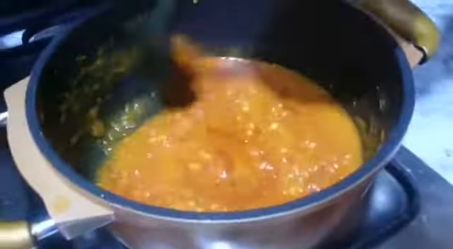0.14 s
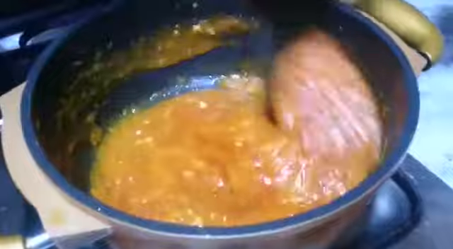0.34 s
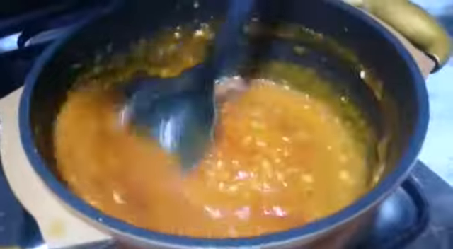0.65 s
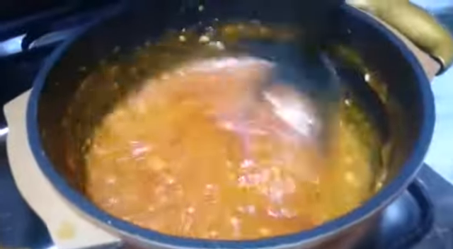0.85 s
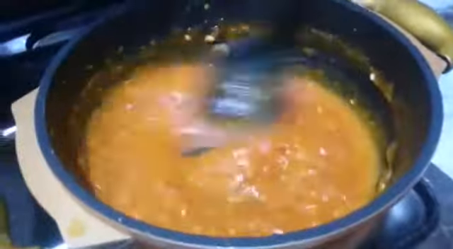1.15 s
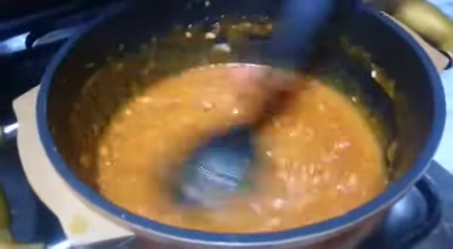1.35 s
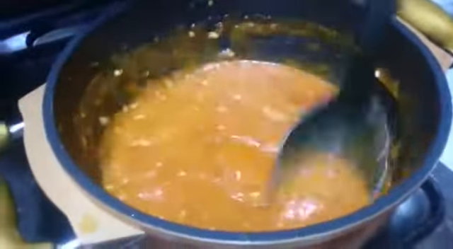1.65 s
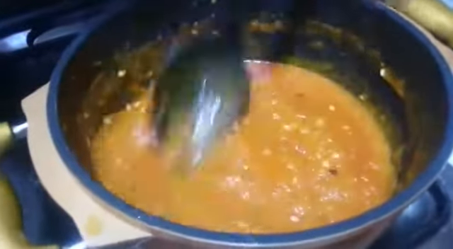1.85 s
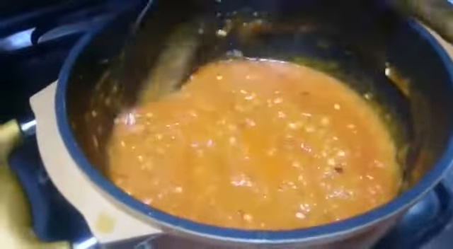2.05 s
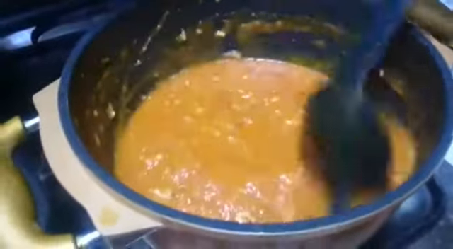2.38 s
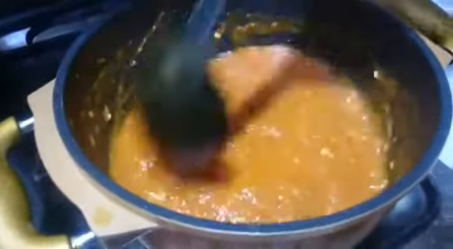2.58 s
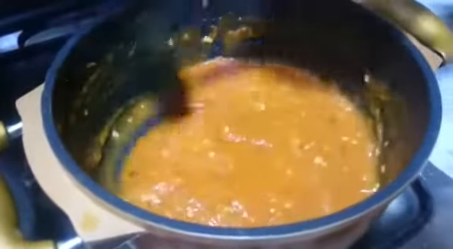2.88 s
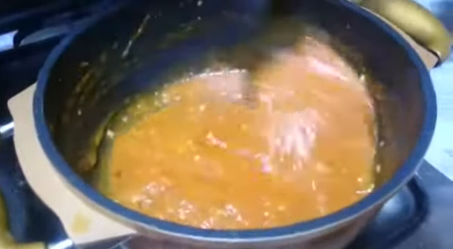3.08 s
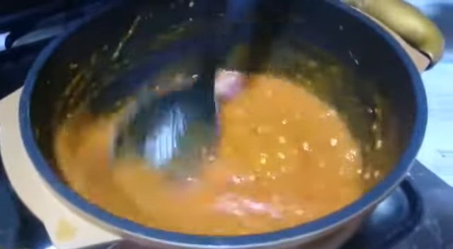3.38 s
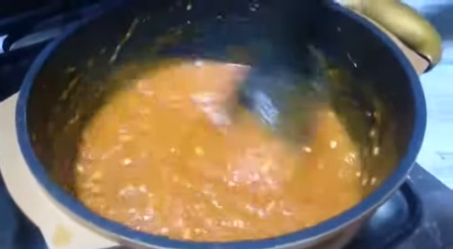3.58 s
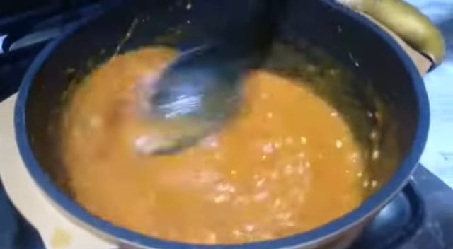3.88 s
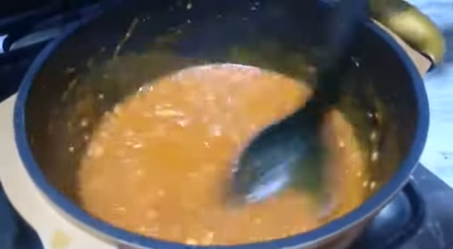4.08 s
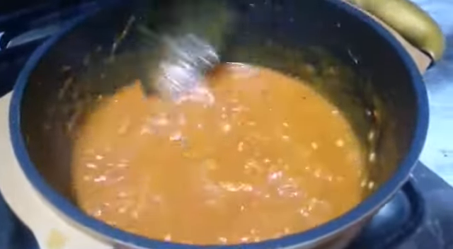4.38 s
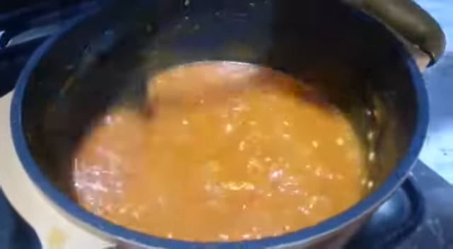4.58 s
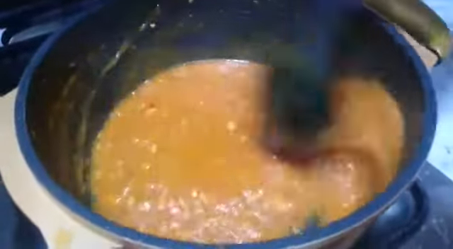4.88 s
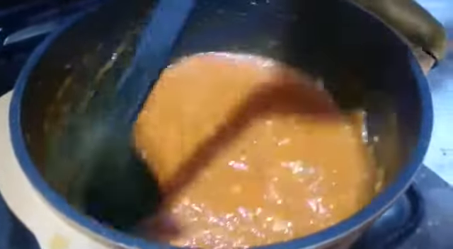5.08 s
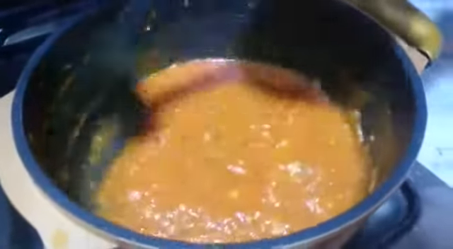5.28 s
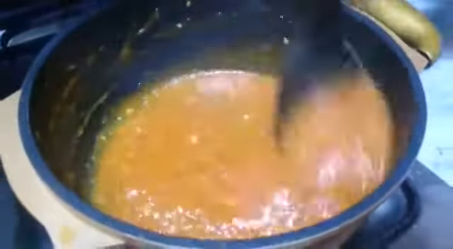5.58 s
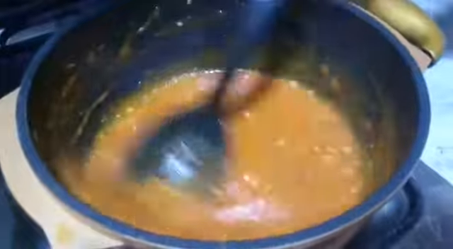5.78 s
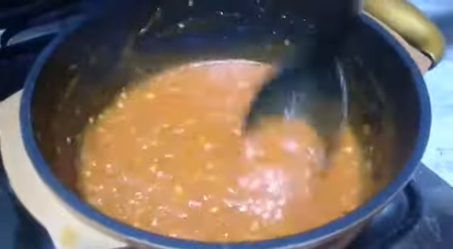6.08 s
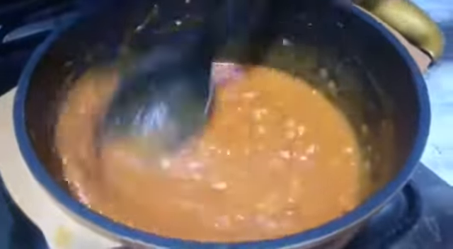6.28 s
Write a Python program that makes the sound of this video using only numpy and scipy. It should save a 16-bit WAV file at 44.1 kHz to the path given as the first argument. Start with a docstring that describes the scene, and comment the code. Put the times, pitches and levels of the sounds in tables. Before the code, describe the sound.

A plastic spoon stirs thick sauce in a coated metal pot on a stove. Irregular hollow knocks ring briefly and are damped by the sauce, each with a soft low thump beneath. Between them come quiet rubbing, raspy scrapes on the bare wall, tiny squeaks and bright wet smacks. Heard very close in a small kitchen with faint steady hiss; fuller and louder on the right, thin on the left.

```python
"""Stirring thick sauce in a metal pot

A plastic spoon stirs thick sauce in a coated metal pot on a stove, heard close by in a small kitchen.
Knocks and rubbing ring the pot's damped modes; friction and slosh are coloured noise, squeaks are narrow tones.
Torn sauce films smack in short bright bursts, and the stove thumps under each blow.
The right port faces the pot; the left one hears the bass inverted and a faint, bright view of the rest."""
import sys
import numpy as np
from scipy import signal
from scipy.fft import rfft, irfft
from scipy.io import wavfile
from scipy.ndimage import uniform_filter1d

SR = 44100
rng = np.random.default_rng(int(sys.argv[2]) if len(sys.argv) > 2 else 0)


def pcm_store(signal):
    """Save signal as 16-bit PCM."""
    levels = np.round(np.clip(np.atleast_2d(signal), -1, 1) * 32767)
    wavfile.write(sys.argv[1], SR, levels.astype(np.int16).T)


N = 284004  # samples

# Spoon striking the pot. Each row: start in seconds, relative blow level in dB, then wall ring, bass,
# body and lowest mode, all four in dB against the blow.
KNOCKS = [(0.0606, -42, -9, -11, -6, -15), (0.1489, -29.5, 11, -9.5, -4, -4),
          (0.4186, -17, -11.5, -13.5, -1, -7), (0.8465, -25, 1, -14, -6, 1),
          (0.9513, -20, -10, -14, -3.5, 1.5), (1.369, -35.5, -41, -18, -10, -15),
          (1.6831, -18, -18, -19, -6, -13), (2.0814, -32.5, -11, -8, -20, -5),
          (2.1388, -33.5, -11, -11, 1.5, -2), (2.163, -39.5, 3.5, -11, -6, 2),
          (2.1907, -15, 1, -14, -12, -2), (2.2649, -18, -19, -15.5, -4, -1.5),
          (2.7711, -28, -9, -45, -19, -30), (2.8887, -19, 4.5, -21, -15, -1.5),
          (3.1903, -16.5, -18, -17, -2, -14), (3.4026, -32.5, -25, -25, -7.5, -12),
          (4.142, -37, -3.5, -35, -18, -28), (4.4757, -30, -9, -6.5, -9, -4),
          (4.5149, -32, -11, -21, 1, -5), (4.6143, -16, 3.5, -18, -12, -5.5),
          (4.6963, -17.5, -26, -16.5, -8.5, -5), (5.1642, -55, 9, -15, -12, -22),
          (5.2986, -18, 5, -20, -13, -7), (5.5837, -15, -18, -18.5, -5.5, -15)]
# Sauce smacking off the spoon. Each row: start in seconds, relative level in dB, top treble in dB against it.
SMACKS = [(0.0024, -7.5, -21), (0.687, -11.5, -34.5), (0.725, -30.5, -16), (1.386, -22.5, -20.5),
          (1.5002, -17.5, -18.5), (1.511, -23.5, -17), (1.762, -33, -9), (1.898, -34, -25),
          (2.08, -25, -19), (2.5701, -53.5, -1.5), (2.7676, -11.5, -21.5), (2.851, -23, -28),
          (3.4018, -21, -24), (3.478, -21, -27), (4.1405, -16.5, -18.5), (4.474, -25, -22),
          (4.551, -30, -17), (4.889, -33, -33), (5.1636, -17, -28.5), (5.263, -22, -30),
          (5.634, -21.5, -24), (5.8057, -35.5, -24), (5.833, -29, -19), (6.25, -47, -12),
          (6.286, -48.5, -6)]
# Modes of the pot, damped by sauce. Each row: frequency in Hz, level in dB, time to decay by 60 dB in seconds.
POT_MODES = [(201.4, -19.5, 0.53), (698, -7, 0.24), (767.7, 2.5, 0.074), (932, -5.5, 0.021),
             (1116, -6, 0.058), (1265, -4.5, 0.085), (1354, -7.5, 0.12), (1957, -19, 0.12),
             (2068, -10, .12), (2241, 2, .115), (2330, -9, .07), (2410, -11, .09), (2475, -8, .12),
             (2630, -39, 0.016), (2870, -7.5, 0.033), (3190, -3.5, 0.026), (3105, -14.5, 0.013),
             (3357, -5, 0.03), (3623, -6.5, 0.0086), (3776, -17, 0.056), (4000, -55, 0.17),
             (5220, 1, 0.013), (5570, -12.5, 0.061), (6110, 2, 0.044), (6520, 2, 0.011), (6600, -15, 0.042)]
# Spectrum of a blow's crack. Each row: frequency in Hz, gain in dB.
CRACK_SPECTRUM = [(100, -21), (400, -7), (900, 6), (2500, 8), (3800, -3), (4600, -1.5), (6200, 0.5),
                  (8500, -6), (10500, -19), (16000, -92)]
# Spectrum of rubbing friction. Each row: frequency in Hz, gain in dB.
RUB_SPECTRUM = [(500, -19.5), (1000, -2), (2000, 5), (3200, 2.5), (4000, -1), (4600, -19), (6000, -37)]
# Spectrum shape of the steady kitchen noise. Each row: frequency in Hz, relative density in dB.
HUM_SPECTRUM = [(18, -25), (30, 11), (48, -19), (138, -21), (600, -18), (780, 16), (2480, -35), (3060, 5),
                (4420, 0), (6210, 3.5), (16000, -83)]
# Response of the port facing the pot. Each row: frequency in Hz, gain in dB.
RIGHT_PORT = [(30, 13), (150, 9), (350, 10), (700, 9.5), (1500, 6), (7000, 8), (11000, 1.5), (16000, 3.5)]
# Response of the other port. Each row: frequency in Hz, gain in dB.
LEFT_PORT = [(30, -12.5), (200, 1), (600, 3), (1200, -5.5), (2500, -13), (5000, -16), (7500, -3),
             (11000, 0), (16000, 0)]
# The spoon drags and one patch of the pot sings. Each row: start in seconds, length in seconds,
# centre in Hz, level in dB.
SQUEAKS = [(.255, 0.042, 2240, -51), (0.319, 0.05, 2560, -42.5), (1.221, 0.042, 2930, -52),
           (1.39, 0.06, 3260, -52.5), (1.572, 0.057, 3340, -49.5), (1.613, 0.071, 2780, -51),
           (1.857, 0.076, 3150, -54.5), (1.848, 0.093, 2020, -55), (2.615, 0.024, 3500, -54),
           (2.994, 0.098, 6170, -51.5), (3.049, 0.071, 2560, -45), (3.101, 0.051, 1820, -51),
           (3.554, 0.055, 3020, -52), (4.203, 0.18, 3150, -57.5), (4.94, .09, 3650, -52.5),
           (5.441, 0.025, 5570, -46), (5.46, 0.06, 2570, -48.5), (5.488, .055, 2280, -47),
           (5.992, 0.069, 2970, -51.5), (6.231, 0.12, 3040, -52.5)]
# The spoon dragging through sauce, dipping where it lifts. Each row: time in seconds, rub level in dB.
DRAG = [(0, -49.5), (.55, -54.5), (1.34, -54), (1.76, -55), (1.9, -53), (1.95, -68), (2.1, -56), (2.3, -59),
        (2.48, -53.5), (2.53, -63), (2.8, -60.5), (3.4, -54), (3.52, -56), (3.9, -58.5), (4.3, -53.5),
        (4.38, -63.5), (4.58, -52), (4.8, -53.5), (5.1, -59), (5.95, -54), (6.2, -58.5), (6.44, -55)]
# The spoon edge scraping the bare wall. Each row: start in seconds, time held in seconds,
# edge rasp in dB, change while held in dB.
SCRAPES = [(.08, 0.37, -48.5, -0.5), (.72, 0.018, -58, -4), (2.301, 0.086, -47.5, 2),
           (2.85, .38, -47.5, -4.5), (3.3, 0.13, -62.5, 0), (4.68, 0.25, -50.5, -7),
           (5.25, 0.29, -45, -6.5), (6.24, 0.071, -64, 0)]

HUM_DB = -65
EDGE_DB, EDGE_PER_WALL_DB = -10.5, -0.23  # treble of a blow: duller the more the wall rings
THUMP_DB, THUMP_PER_BASS_DB = -15.5, 0.52  # stove thump against the blow, rising with its bass
SMACK_HZ, SMACK_T60_S, SMACK_RISE_S = 6260, 0.018, 0.0012
SCRAPE_ATTACK_S, SCRAPE_RELEASE_DB_PER_S = 0.088, 224
SCRAPE_RUB_DB, SCRAPE_FIZZ_DB = -3, -14.5  # against the rasp
DRAG_EDGE_DB, DRAG_FIZZ_DB = -10, -30  # against the drag
SLOSH_DB, SLOSH_BLOW_DB, SLOSH_T60_S = -62.5, -31.5, 1.07  # at rest; against a blow; settling
SLOSH_PER_DRAG_DB = 0.18
SHUDDER_DB, SHUDDER_T60_S = -8.5, 0.13  # the spoon skids on after a blow
WALL_WIDTH_HZ, SAUCE_WIDTH_HZ = 25, 410  # pure on the bare wall, blurred under sauce
FAINT_COUNT, FAINT_S, FAINT_WIDTH_HZ = 30, 0.06, 200  # chance squeaks, with their mean length
FAINT_LOW_HZ, FAINT_HIGH_HZ, FAINT_DB = 1800, 3600, -3  # level against the drag
EARLY_T60_S, LATE_T60_S, LATE_DB = 0.05, 0.3, 20  # late part against the early one
ROOM_DB = -11
SHARED_HZ, SHARED_DB = 537, -3  # inverted bass in the left channel
TOP_HZ = 16200


def amp(db):
    """Decibel law: the amplitude ratio of a level in dB."""
    return 10 ** (np.asarray(db) / 20)


def unit(x):
    """Normalisation: scales to rms 1."""
    return x / np.sqrt(np.mean(x ** 2))


def power_sum(*levels_db):
    """Incoherent addition: the powers of unrelated sounds add."""
    return 10 * np.log10(sum(amp(db) ** 2 for db in levels_db))


def decay(t, t60):
    """Exponential damping: amplitude falls by 60 dB in t60 seconds."""
    return np.exp(-np.log(1000) * t / t60)


def colour(x, points):
    """Minimum-phase filtering: the folded cepstrum makes causal a gain through (Hz, dB) points on a log axis."""
    size = 4096
    hz, db = np.transpose(points)
    bins_hz = np.arange(size // 2 + 1) * SR / size
    gain_db = np.interp(np.log(bins_hz + 1), np.log(hz), db)
    cepstrum = irfft(np.log(amp(gain_db)), size)
    cepstrum[1:size // 2] *= 2
    cepstrum[size // 2 + 1:] = 0
    impulse_response = irfft(np.exp(rfft(cepstrum)), size)[:size // 2]
    return signal.oaconvolve(x, impulse_response)[:len(x)]


def ring(x, hz, t60):
    """Damped resonance: one mode, which an impulse of 1 rings with amplitude 1."""
    radius = decay(1 / SR, t60)
    angle = 2 * np.pi * hz / SR
    return signal.lfilter([0, radius * np.sin(angle)], [1, -2 * radius * np.cos(angle), radius ** 2], x)


def walk(rate):
    """Random modulation: levels of spread near 1, redrawn rate times a second and joined by glides."""
    hold = int(SR / rate)
    steps = np.repeat(rng.standard_normal(N // hold + 1), hold)
    return uniform_filter1d(steps, hold)[:N]


def add(out, s, piece):
    """Superposition: mixes a piece in at time s in seconds."""
    i = int(s * SR)
    out[i:i + len(piece)] += piece[:len(out) - i]


def burst(rise_s, t60, size=8192):
    """Transient noise: swells with time constant rise_s and dies over t60."""
    t = np.arange(size) / SR
    return rng.standard_normal(size) * (1 - np.exp(-t / rise_s)) * decay(t, t60)


def grit(rough_db):
    """Friction noise: dense slips of uneven size."""
    return unit(rng.standard_normal(N) * amp(rough_db * walk(400)))


def patchy(x, patchy_db):
    """Time-frequency modulation: small patches of pitch and time swell and sink on their own."""
    spectrum = signal.stft(x, nperseg=512)[2]
    patch = uniform_filter1d(rng.standard_normal(spectrum.shape), size=3, axis=0)
    patch = uniform_filter1d(patch, size=6, axis=1)
    return unit(signal.istft(spectrum * amp(patchy_db * unit(patch)), nperseg=512)[1][:N])


def kitchen_hum():
    """Stationary noise: the steady coloured background of the kitchen."""
    return amp(HUM_DB) * unit(colour(rng.standard_normal(N), HUM_SPECTRUM))


def after_blows(t, t60):
    """Exponential settling: the level in dB of what each blow sets moving."""
    return power_sum(*(np.where(t > s, blow - 60 * (t - s) / t60, -200) for s, blow, *_ in KNOCKS))


def scraping(t):
    """Envelope of dry friction: each scrape builds, drifts while held and falls away, in dB."""
    levels_db = []
    for s, held, db, change_db in SCRAPES:
        attack_db = 20 * np.log10(np.clip((t - s) / SCRAPE_ATTACK_S, 1e-6, 1))
        drift_db = change_db * np.clip((t - s) / held, 0, 1)
        release_db = SCRAPE_RELEASE_DB_PER_S * np.maximum(t - s - held, 0)
        levels_db.append(db + attack_db + drift_db - release_db)
    return power_sum(*levels_db)


def motion():
    """Common excitation: drag, scrapes and blows set rub, edge rasp, fizz and slosh, in dB every 1 ms."""
    t = np.arange(0, N / SR, 1 / 1000)
    drag_db = np.interp(t, *np.transpose(DRAG))
    scrape_db = scraping(t)
    shudder_db = after_blows(t, SHUDDER_T60_S) + SHUDDER_DB
    rub_db = power_sum(drag_db, scrape_db + SCRAPE_RUB_DB, shudder_db)
    edge_db = power_sum(drag_db + DRAG_EDGE_DB, scrape_db)
    fizz_db = power_sum(drag_db + DRAG_FIZZ_DB, scrape_db + SCRAPE_FIZZ_DB)
    stirred_db = SLOSH_DB + SLOSH_PER_DRAG_DB * (drag_db - drag_db.mean())
    slosh_db = power_sum(stirred_db, after_blows(t, SLOSH_T60_S) + SLOSH_BLOW_DB)
    return rub_db, edge_db, fizz_db, slosh_db


def stirring(rub_db, edge_db, fizz_db, slosh_db):
    """Sliding friction and liquid motion: broad rub, edge rasp near 6 kHz, fine fizz and low slosh."""
    edge_shape = [(4000, -14.5), (5200, -4.5), (6200, -2), (7500, -8), (9000, -10), (11000, -27)]
    fizz_shape = [(7000, -36), (10000, 0), (15000, -6.5)]
    slosh_shape = [(25, -8.5), (70, 6.5), (400, 0.5), (800, -3.5), (1500, -2.0), (2500, -31.5)]
    rub = patchy(colour(grit(2.7), RUB_SPECTRUM), patchy_db=3.5)
    edge = patchy(colour(grit(2.5), edge_shape), patchy_db=2.0)
    fizz = patchy(colour(grit(2.8), fizz_shape), patchy_db=1.0)
    slosh = unit(colour(grit(0.87), slosh_shape))
    flutter_db = 1.6 * walk(35)  # shared by rasp and fizz
    return (rub * amp(rub_db + 2.02 * walk(25)) + edge * amp(edge_db + flutter_db)
            + fizz * amp(fizz_db + flutter_db) + slosh * amp(slosh_db + 2.1 * walk(12)))


def edge_of_blow(wall):
    """Spectral balance of impact: treble in dB against the blow, from its wall ring."""
    return EDGE_DB + EDGE_PER_WALL_DB * wall


def pot(rub_db):
    """Modal synthesis: blows and rubbing drive the same modes; each contact point favours other ones."""
    out = np.zeros(N)
    shape = (len(KNOCKS), len(POT_MODES))
    spot_db = 2.8 * rng.standard_normal(shape)
    # bending waves reach each mode within the first milliseconds, in either direction
    late_s = 0.003 * rng.random(shape)
    sign = rng.choice([-1, 1], shape)
    slips = grit(1.3)
    tone_hz = [300, 600, 850, 900, 1400, 1800, 2050, 2500, 2580, 4200, 5300]
    for m, (hz, db, t60) in enumerate(POT_MODES):
        mode_rub_db = np.interp(hz, *np.transpose(RUB_SPECTRUM)) - 52.5
        push = slips * amp(rub_db + mode_rub_db + 0.83 * walk(28))
        for k, (s, blow, wall, bass, body, rock) in enumerate(KNOCKS):
            # blows also rock the whole pot at its lowest mode
            tones_db = [rock, bass, bass, body, body, 0, wall, wall, 0, 0, edge_of_blow(wall)]
            blow_db = blow + np.interp(hz, tone_hz, tones_db) + spot_db[k, m] - 3.0
            push[int((s + late_s[k, m]) * SR)] += sign[k, m] * amp(blow_db)
        out += amp(db) * ring(push, hz, t60)
    # soft plastic cannot drive the highest pitches
    return signal.sosfilt(signal.butter(4, 8500, fs=SR, output="sos"), out)


def smacks():
    """Film rupture: short bright bursts as sauce films tear."""
    out = np.zeros(N)
    for s, db, top_db in SMACKS:
        tick = burst(SMACK_RISE_S, SMACK_T60_S)
        film_fizz = amp(-17.5) * burst(0.0045, 0.1)
        shape = [(900, -30), (3500, -13), (SMACK_HZ, 0), (9800, top_db + 9.5), (16000, top_db)]
        add(out, s, amp(db + 2.5) * colour(tick + film_fizz, shape))
    return out


def cracks():
    """Broadband impact: the dense rest of each blow, as coloured noise."""
    out = np.zeros(N)
    for s, blow, wall, bass, body, _ in KNOCKS:
        balance = [(700, bass), (1300, body), (2000, 0), (4200, 0.0043), (5300, edge_of_blow(wall))]
        crack = colour(colour(burst(0.00023, 0.095), CRACK_SPECTRUM), balance)
        add(out, s, crack * amp(blow - 3.0))
    return out


def thumps():
    """Structure-borne sound: under each blow a rumble swells late in the stove."""
    out = np.zeros(N)
    shape = [(30, -21), (90, 2), (350, 6.0), (1200, -1.5), (2500, -63)]
    for s, blow, _, bass, *_ in KNOCKS:
        thump_db = THUMP_DB + THUMP_PER_BASS_DB * bass
        rumble = colour(burst(0.014, 0.36, size=16384), shape)
        add(out, s, amp(blow + thump_db + 11.5) * rumble)
    return out


def on_bare_wall(s):
    """Contact condition: whether a scrape is being held at time s."""
    return any(start < s < start + held for start, held, *_ in SCRAPES)


def squeaks(faint):
    """Stick-slip: friction locks on to one resonance, whose wandering phase sets the width."""
    out = np.zeros(N)
    rows = []
    for s, length, hz, db in SQUEAKS:
        rows.append((s, length, hz, WALL_WIDTH_HZ if on_bare_wall(s) else SAUCE_WIDTH_HZ, db))
    # fainter ones come by chance
    for when, long, pitch in faint:
        s = when * N / SR
        hz = FAINT_LOW_HZ + pitch * (FAINT_HIGH_HZ - FAINT_LOW_HZ)
        db = np.interp(s, *np.transpose(DRAG)) + FAINT_DB
        rows.append((s, FAINT_S * (0.5 + long), hz, FAINT_WIDTH_HZ, db))
    for s, length, hz, width_hz, db in rows:
        wander = np.sqrt(2 * np.pi * width_hz / SR) * rng.standard_normal(int(length * SR))
        song = np.sin(np.cumsum(2 * np.pi * hz / SR + wander))
        song = unit(ring(song, hz, 1.2 / width_hz))
        add(out, s, amp(db) * song * np.sqrt(np.hanning(len(song))))
    return out


def kitchen(x):
    """Reverberation: close reflections and a short tail, as noise with two decays."""
    t = np.arange(SR // 2) / SR
    fade = decay(t, EARLY_T60_S) + amp(LATE_DB) * decay(t, LATE_T60_S)
    response = rng.standard_normal(len(t)) * fade / np.sqrt(np.sum(fade ** 2))
    return signal.fftconvolve(x, response)[:N]


def side_of_pot(levels_db, faint):
    """Direct and reflected sound: all sources as one side of the pot radiates them, in the kitchen."""
    rub_db, edge_db, fizz_db, slosh_db = (
        np.interp(np.arange(N), np.arange(len(db)) * SR / 1000, db) for db in levels_db)
    near = stirring(rub_db, edge_db, fizz_db, slosh_db) + pot(rub_db)
    near += smacks() + cracks() + thumps() + squeaks(faint)
    return near + amp(ROOM_DB) * kitchen(near) + kitchen_hum()


def scene():
    """Partial coherence: two ports meet the same events from different sides, with unlike fine grain."""
    levels_db = motion()
    faint = rng.random((FAINT_COUNT, 3))  # chance of time, length and pitch
    return np.array([side_of_pot(levels_db, faint), side_of_pot(levels_db, faint)])


def record(dry):
    """Transduction: ports colour the sound, the left gets inverted bass, peaks round off and the top is cut."""
    right = colour(dry[0], RIGHT_PORT)
    shared_bass = signal.filtfilt(*signal.butter(2, SHARED_HZ, fs=SR), right)
    left = colour(dry[1], LEFT_PORT) - amp(SHARED_DB) * shared_bass
    top_cut = signal.ellip(8, 0.2, 70, TOP_HZ, fs=SR, output="sos")
    return signal.sosfilt(top_cut, np.tanh([left, right]))


dry = scene()
out = record(dry)
pcm_store(out)
```